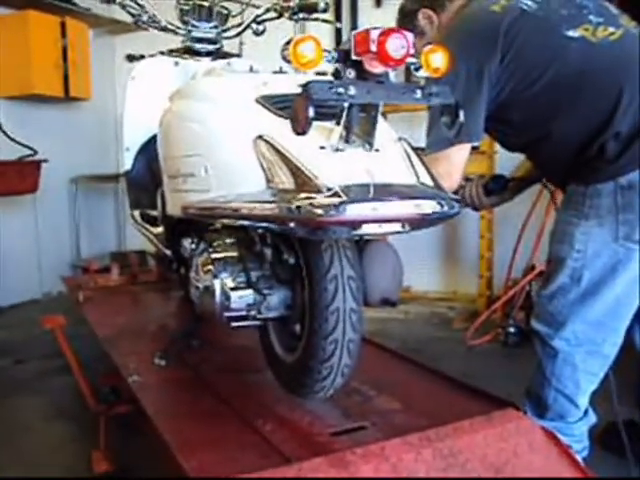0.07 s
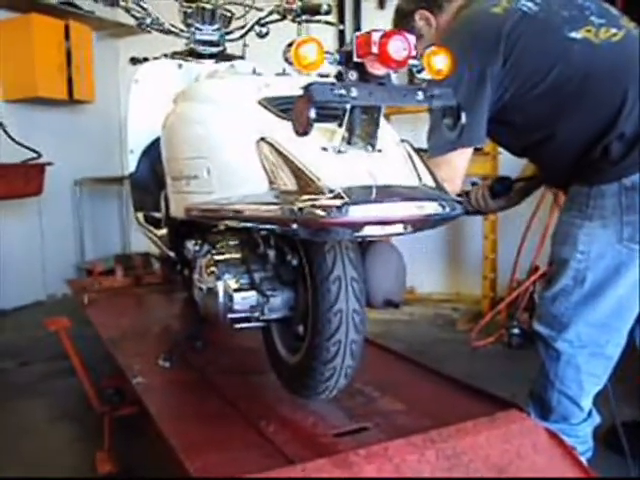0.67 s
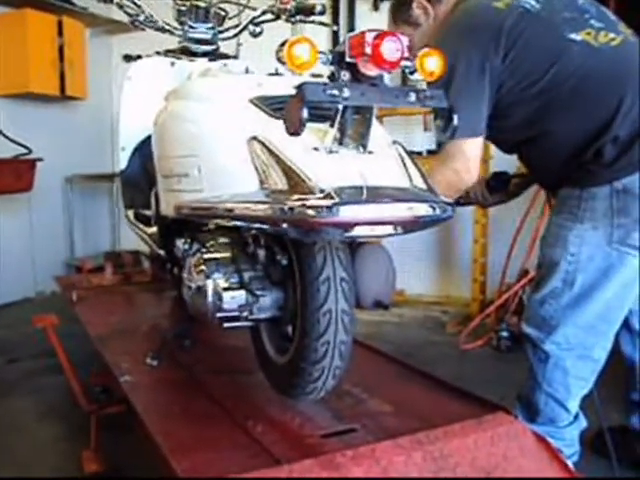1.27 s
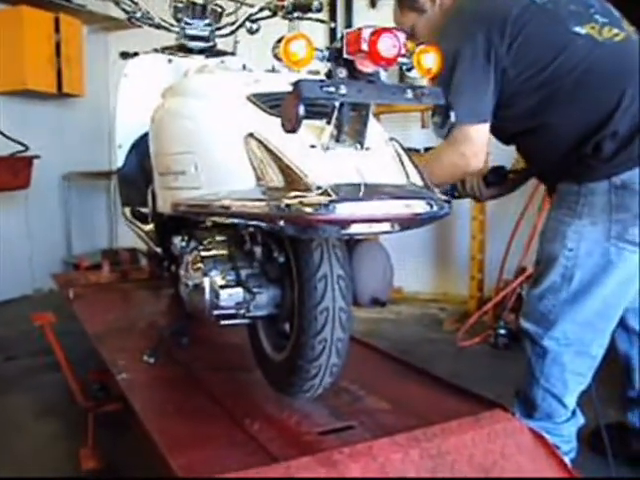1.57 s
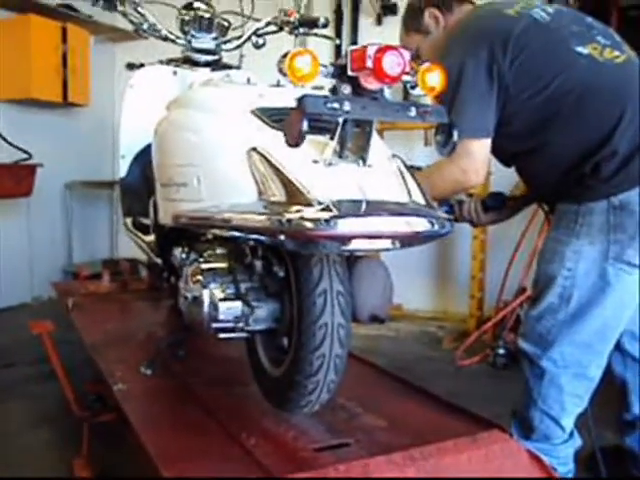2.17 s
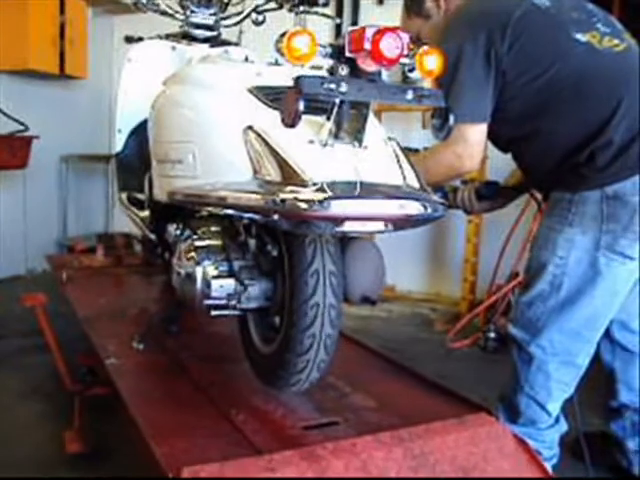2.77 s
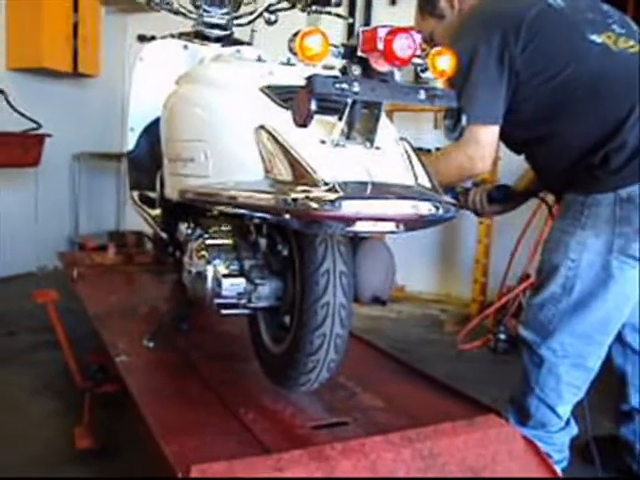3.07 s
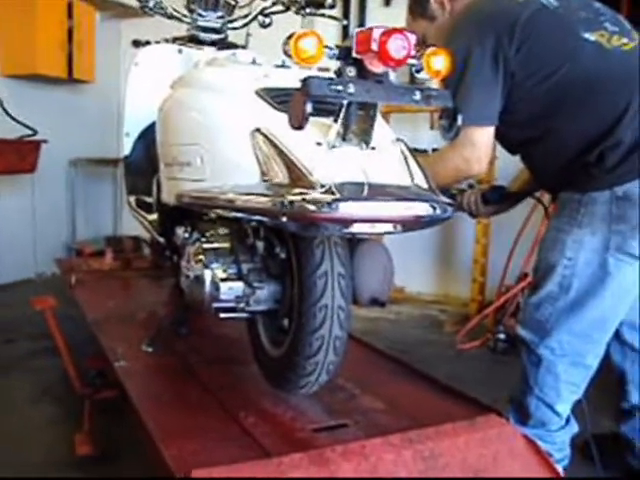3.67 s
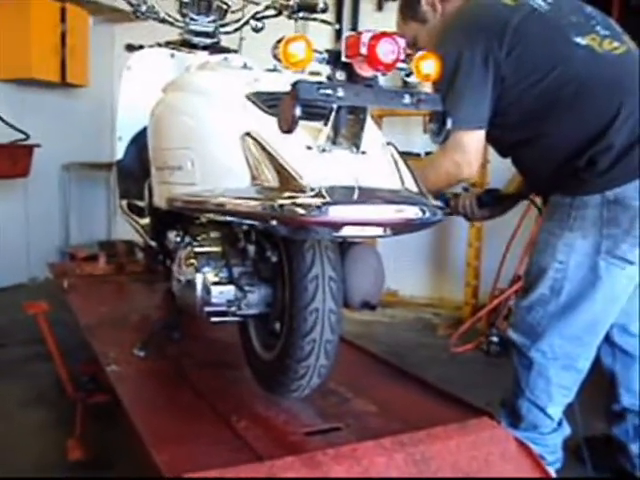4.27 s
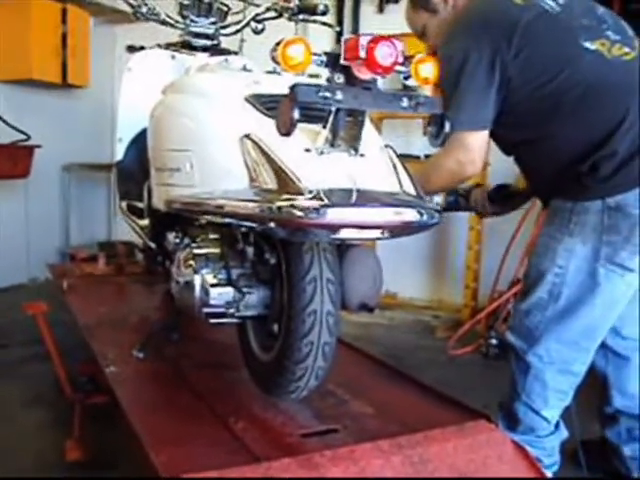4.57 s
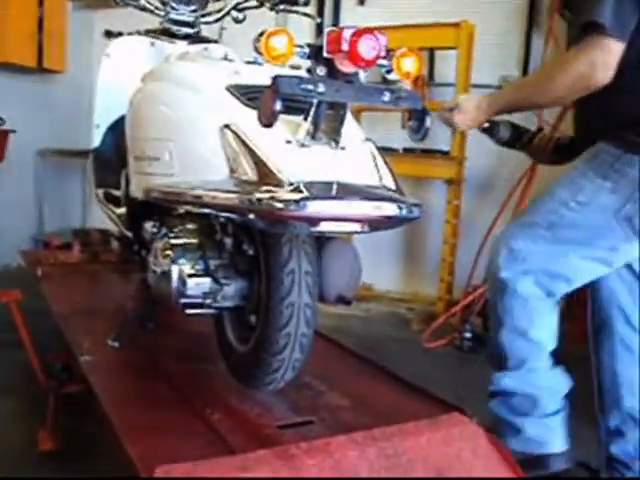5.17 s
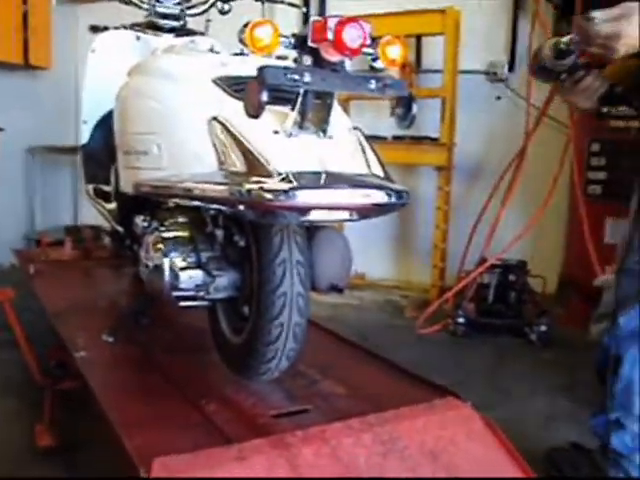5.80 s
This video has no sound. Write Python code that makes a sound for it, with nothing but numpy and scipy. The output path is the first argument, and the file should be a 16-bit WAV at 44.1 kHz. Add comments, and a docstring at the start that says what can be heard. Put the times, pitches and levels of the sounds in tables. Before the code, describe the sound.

Two hissing, buzzing runs of an air ratchet on scooter bolts, each coasting down in a falling rattle over low workshop hum.

```python
"""An air ratchet backs bolts out of a scooter in a workshop, in two bursts.
Exhaust air rushes and hums while the trigger is held; gears rattle and whine on as the rotor coasts.
The socket knocks on the bolts and scrapes, over a low workshop rush and hum.
A small camera samples the sound coarsely, which adds a thin fizz on top."""
import sys
import numpy as np
from scipy import signal
from scipy.fft import rfft, irfft, next_fast_len
from scipy.io import wavfile
from scipy.ndimage import map_coordinates

SR = 44100
rng = np.random.default_rng(int(sys.argv[2]) if len(sys.argv) > 2 else 0)


def transcribe(u):
    """Save the signal u as a 16-bit wav file named by the first command-line argument.

    u: samples, shape (n,) or (channels, n), limited to [-1, 1]; the rate is SR.
    q: integer samples, one column per channel.
    """
    v = np.clip(np.atleast_2d(u).T, -1, 1)
    q = np.round(v * 32767).astype(np.int16)
    wavfile.write(sys.argv[1], SR, q)


N = 257544

# Trigger pulls. Each row: touch, full squeeze, hardest press and release in seconds, rotor speed limit
# in Hz, friction loss in Hz/s, rattle and rasp in dB, fade as the tool is drawn away in dB/s.
PULLS = [(-.55, -.1, 0.63, 1.07, 337.2, 80.02, -30, -36.5, 0.5),
         (3.37, 3.715, 4.28, 4.63, 340, 104.9, -31, -42.5, 3.5)]


def amp(db):
    """Decibels to gain."""
    return 10 ** (np.asarray(db) / 20)


def unit(x):
    """Scale to rms 1."""
    return x / np.sqrt(np.mean(x ** 2) + 1e-20)


def along(points, hz):
    """(Hz, value) points read on a log axis."""
    f, v = np.transpose(points)
    return np.interp(np.log(hz + 1), np.log(f), v)


def bell(x, centre, half):
    """Gaussian hump of height 1."""
    return np.exp(-((x - centre) / half) ** 2)


def wobble(rate_hz):
    """Smooth random curve, rate_hz knots a second."""
    knots = rng.standard_normal(int(N * rate_hz / SR) + 4)
    return map_coordinates(knots, [np.arange(N) * rate_hz / SR])


def tone(turns):
    """Sine of rms 1, phase in turns."""
    return np.sqrt(2) * np.sin(2 * np.pi * turns)


def filtered(x, response):
    """x through a frequency response."""
    m = next_fast_len(N + SR // 2)
    return irfft(rfft(x, m) * response(np.fft.rfftfreq(m, 1 / SR)), m)[:N]


def shaped(x, spectrum):
    """x through a (Hz, dB) curve."""
    return filtered(x, lambda hz: amp(along(spectrum, hz)))


def coloured(x, spectrum):
    """x shaped, at rms 1."""
    return unit(shaped(x, spectrum))


def ringing(x, modes):
    """x through (Hz, width in Hz, dB) resonances, at rms 1."""
    return unit(filtered(x, lambda f: sum(
        amp(db) * 1j * f * width / (hz * hz - f * f + 1j * f * width) for hz, width, db in modes)))


def workshop(floor_db=-48.5, drone_hz=88.3, drone_db=-62):
    """Background rush, a low drone that swells once, and faint mains hum."""
    # Rush spectrum, then hum tones. Each row: frequency in Hz, level in dB.
    rush_spectrum = [(15, -46), (25, -29), (43, -9.5), (72, -11), (135, -9.5), (189, -5.5), (325, -5.5),
                     (363, -10), (667, -11.5), (746, -9.5), (914, -12), (1530, -26), (5400, -32.5),
                     (7020, -71), (11900, -120)]
    hum_tones = [(121, -62), (240, -61), (333, -63.5)]
    # Drone swell: centre and half length in seconds, rise in dB.
    drone_swell = (1.33, 0.34, 7.3)
    centre_s, half_s, swell_db = drone_swell
    t = np.arange(N) / SR
    rush = amp(floor_db + .6 * wobble(9.3)) * coloured(rng.standard_normal(N), rush_spectrum)
    drone_gain = amp(drone_db + swell_db * bell(t, centre_s, half_s) + wobble(21))
    drone = drone_gain * tone(drone_hz * t + .32 * wobble(14))
    return rush + drone + sum(amp(db) * tone(hz * t + .21 * wobble(10)) for hz, db in hum_tones)


def room(x):
    """Wall reverberation; treble dies first."""
    # Each row: frequency in Hz, t60 in seconds.
    wall_decay = [(150, 0.83), (1000, 0.49), (5000, 0.31)]
    hz, t, noise = signal.stft(rng.standard_normal(SR // 2), SR, nperseg=256)
    tail = signal.istft(noise * amp(-60 * t / along(wall_decay, hz)[:, None]), SR, nperseg=256)[1]
    return signal.fftconvolve(x, tail / np.linalg.norm(tail))[:N]


def handling(bump_t60_s=.26, bump_rise_s=.01):
    """The socket scrapes as it is moved; dull bumps as the mechanic steps back."""
    # Each row: centre and half length in seconds, level in dB.
    scrapes = [(2.672, .028, -50), (2.848, .008, -54), (2.975, .022, -49), (3.174, .009, -51),
               (3.275, .025, -53)]
    # Each row: frequency in Hz, level in dB.
    scrape_spectrum = [(300, -12), (800, 11.5), (1500, 2.5), (2050, -2), (2500, -20), (3400, -21),
                       (5400, -14)]
    # Each row: start in seconds, pitch in Hz, level in dB.
    bumps = [(4.65, 193, -45), (5.2, 190.5, -42), (5.279, 162, -42.5)]
    t = np.arange(N) / SR
    strokes = sum(amp(db) * bell(t, centre_s, half_s) for centre_s, half_s, db in scrapes)
    out = strokes * coloured(rng.standard_normal(N) * amp(2.2 * wobble(330)), scrape_spectrum)
    for start_s, hz, db in bumps:
        age_s = np.maximum(t - start_s, 0)
        out += amp(db - 60 * age_s / bump_t60_s) * (1 - np.exp(-age_s / bump_rise_s)) * tone(hz * age_s)
    return out


def burst(start_s, t60_s):
    """Decaying noise of one contact."""
    age_s = np.arange(N) / SR - start_s
    return rng.standard_normal(N) * (age_s >= 0) * amp(-60 * np.abs(age_s) / t60_s)


def contacts(knock_db=4, thud_db=1):
    """The socket knocks on the bolt, the scooter's body thuds under it, and loose steel ticks."""
    # Each row: start in seconds, level in dB, relative thud level in dB.
    knock_events = [(.147, -12, -8), (.988, -16, -25), (1.014, -17, -19), (1.029, -14.5, -17),
                    (1.116, -18, -32), (1.504, -20.5, -29), (2.652, -34, 5), (2.991, -30.5, 1),
                    (3.718, -26, -4), (3.754, -16, -9), (4.005, -16.5, -24), (5.228, -27, -9)]
    # Each row: start in seconds, level in dB.
    tick_events = [(2.8615, -32), (5.2435, -22), (5.353, -24.5)]
    # Each row: frequency in Hz, gain in dB.
    knock_spectrum = [(100, -38), (400, -14), (700, -6), (970, 5.5), (1300, -8), (2200, -24), (5400, -35)]
    thud_spectrum = [(120, -22), (300, 4), (650, 7.5), (1300, -33), (5000, -60)]
    tick_spectrum = [(300, -6), (900, 3), (1800, 2), (2350, 3), (2800, -7), (3450, -3), (4300, -7),
                     (5400, -12)]
    knocks, thuds = np.zeros(N), np.zeros(N)
    for start_s, db, body_db in knock_events:
        blow = amp(db) * burst(start_s, t60_s=.046)
        knocks += blow
        thuds += amp(body_db) * blow
    ticks = sum(amp(db) * burst(start_s, t60_s=.013) for start_s, db in tick_events)
    out = amp(knock_db) * shaped(knocks, knock_spectrum) + amp(thud_db) * shaped(thuds, thud_spectrum)
    return out + shaped(ticks, tick_spectrum)


def squeals():
    """Short groans and squeals swell and fade under load."""
    # Each row: centre and half length in seconds, pitch in Hz, glide in Hz/s, level in dB, blur in turns.
    squeal_events = [(0.763, 0.07, 429, 0, -36.5, 0.027), (3.532, .055, 591, -500, -43, 0.3),
                     (3.648, 0.043, 2056, 1206, -49.5, 0.11)]
    t, out = np.arange(N) / SR, np.zeros(N)
    for centre_s, half_s, hz, glide, db, blur in squeal_events:
        gain = amp(db + .77 * wobble(28)) * bell(t, centre_s, half_s)
        out += gain * tone(hz * t + glide * (t - centre_s) ** 2 / 2 + blur * wobble(170))
    return out


def drive(spin_up_s=.24, drag_s=2.5, crawl_hz=2):
    """Air spins the rotor up, drag and friction slow it; speed and pressing make the gears loud."""
    t = np.arange(N) / SR
    pulls = np.array(PULLS)
    latest = np.searchsorted(pulls[1:, 0], t)
    touch_s, _, hardest_s, release_s, top_hz, loss_hz_s, rattle_db, rasp_db, away_db_s = pulls[latest].T
    driven_s = np.minimum(t, release_s)
    coast_s = t - driven_s
    reached_hz = top_hz * (1 - np.exp((touch_s - driven_s) / spin_up_s))
    speed_hz = np.maximum(reached_hz * np.exp(-coast_s / drag_s) - loss_hz_s * coast_s, crawl_hz)
    speed_decades = np.log10(speed_hz / top_hz)
    eased_s2 = (driven_s - hardest_s) ** 2
    rattle_db = rattle_db + 41.5 * speed_decades - 13.5 * eased_s2 - away_db_s * coast_s
    rasp_db = rasp_db + 20.5 * speed_decades - 43 * eased_s2 - away_db_s * coast_s
    return speed_hz, rattle_db, rasp_db


def rotor(tremble=.008):
    """Turns made by the rotor, whose speed trembles."""
    speed_hz, _, _ = drive()
    return np.cumsum(speed_hz * (1 + tremble * wobble(45))) / SR


def vanes(turns, count=4, whirr_db=-8.5, blur_turns=.3):
    """The rotor's vanes sing a hoarse note, lifted as it sweeps through the head's resonance."""
    _, rattle_db, _ = drive()
    note = tone(count * turns + blur_turns * wobble(150) + .49 * wobble(30)) * amp(1.9 * wobble(40))
    return amp(rattle_db + whirr_db) * ringing(note, [(1005, 113, -2), (1113, 40, -9)])


def whine(turns, teeth=20, whine_db=-8, octave_db=-7, centre_hz=154, span_hz=83):
    """The gear mesh glides with the rotor, blurred in pitch, and stands out at speeds near centre_hz."""
    speed_hz, _, rasp_db = drive()
    mesh_turns = teeth * turns + .33 * speed_hz / centre_hz * wobble(380) + .14 * wobble(70)
    gain = amp(rasp_db + whine_db + .63 * wobble(55)) * bell(speed_hz, centre_hz, span_hz)
    return gain * (tone(mesh_turns) + amp(octave_db) * tone(2 * mesh_turns))


def impacts(turns, per_turn, scatter_db, slack_teeth=.25, slow_hz=50):
    """Gear teeth strike unevenly in time and force; mean power falls at rotor speeds below slow_hz."""
    teeth = np.arange(int(turns[-1] * per_turn))
    timing, polarity, force = rng.standard_normal((len(teeth), 3)).T
    at = np.interp((teeth + slack_teeth * timing) / per_turn, turns, np.arange(N)).astype(int)
    density = np.maximum(np.gradient(turns)[at], slow_hz / SR)
    return np.bincount(at, np.sign(polarity) * amp(scatter_db * force) / np.sqrt(density), N)


def gears(turns, head_db=-3, housing_db=-6, socket_db=-2.5, rasp_trim_db=-2, grip_hz=335, grip_db=9.5):
    """Tooth impacts rattle the head, ring the steel housing and socket, and add a bright rasp."""
    # Each row: frequency in Hz, level in dB.
    head_spectrum = [(30, -40), (150, -15.5), (240, -10), (300, -9.5), (390, -14), (520, -8), (700, -3),
                     (820, -2), (950, -3), (1250, -3.5), (1600, -5), (2000, -14), (2400, -18.5),
                     (3100, -22.5), (5000, -29)]
    rasp_spectrum = [(1500, -44), (2000, -2.5), (2400, -5), (2880, 0), (3150, -5.5), (3700, -4.5),
                     (4400, -11), (5400, -14.5)]
    # Each row: frequency and width in Hz, level in dB.
    housing_modes = [(920.5, 23, 0), (1008, 19, 3), (1081, 10.5, 3.5), (1214, 18, 1.5), (1340, 79, -12),
                     (1554, 21, -8.5), (1643, 7.2, -9), (1802, 15, -6.5), (1847, 27, -12), (1927, 16, -7.5)]
    socket_modes = [(947, 102, 9.5), (1820, 130, -11.5), (2770, 35, -5.5), (2886, 22, 0)]
    speed_hz, rattle_db, rasp_db = drive()
    chatter = amp(.32 * wobble(60))
    heavy = chatter * impacts(turns, per_turn=12, scatter_db=2.5)
    light = chatter * impacts(turns, per_turn=20, scatter_db=3)
    head = amp(head_db) * coloured(heavy, head_spectrum)
    housing = amp(housing_db) * ringing(light, housing_modes)
    # Held tight at speed, the socket comes loose and jingles as the rotor slows.
    loose = amp(socket_db - grip_db * (speed_hz / grip_hz) ** 4 + 2 * wobble(40))
    socket = loose * ringing(impacts(turns, per_turn=4, scatter_db=2.5), socket_modes)
    rasp = amp(rasp_db + rasp_trim_db) * coloured(light, rasp_spectrum)
    return amp(rattle_db) * (head + housing + socket) + rasp


def exhaust(turns, puff_depth=.34, valve_s=.031, half_open_db=-18.5, air_sag_db_s2=19):
    """While the trigger is held, air leaves in one puff a turn: a pulsing rush and a low hum."""
    # One row a pull: air and hum in dB, hum sag around the hardest press in dB/s^2, hum blur in turns.
    blows = [(-31.5, -41.5, 6, 0.14), (-35.5, -39, 83, 0.062)]
    # Air at the first bolt, then with the tool turned. Each row: frequency in Hz, level in dB.
    first_spectrum = [(71, -45), (120, -24), (288, -7.5), (327, -4.5), (384, -4.5), (429, -8.5),
                      (465, -6.5), (982, -3.5), (1120, -32), (1270, -10.5), (1860, -8.5), (2250, -16.5),
                      (2860, -16.5), (5400, -33.5), (7020, -60), (11900, -120)]
    turned_spectrum = [(71, -45), (120, -25), (227, -19), (284, -7.5), (327, 2), (378, -10.5), (726, -6.5),
                       (811, -24), (998, 0), (1210, -16), (1420, -5), (1770, -16), (1890, -15), (5400, -32),
                       (7020, -63), (11900, -120)]
    t, out = np.arange(N) / SR, np.zeros(N)
    ramp = lambda at_s: np.clip((t - at_s) / valve_s + .5, 0, 1)
    for pull, blow, spectrum in zip(PULLS, blows, (first_spectrum, turned_spectrum)):
        touch_s, squeeze_s, hardest_s, release_s = pull[:4]
        air_db, hum_db, hum_sag_db_s2, blur_turns = blow
        valve = ramp(touch_s) * amp(half_open_db * (1 - ramp(squeeze_s)))
        valve *= 1 - ramp(release_s + valve_s / 2)
        eased_s2 = (t - hardest_s) ** 2
        jet = rng.standard_normal(N) * (1 + puff_depth * tone(turns))
        out += valve * amp(air_db - air_sag_db_s2 * eased_s2) * coloured(jet, spectrum)
        hum_gain = amp(hum_db - hum_sag_db_s2 * eased_s2 + 1.3 * wobble(25))
        out += valve * hum_gain * tone(turns + blur_turns * wobble(45))
    return out


def scene(room_db=-8.5):
    """One rotor drives air, gears, vanes and whine; the mechanical sounds reverberate."""
    turns = rotor()
    metal = gears(turns) + vanes(turns) + whine(turns) + contacts() + handling()
    return (exhaust(turns) + squeals() + metal + amp(room_db) * room(metal) + workshop())[None]


def record(dry, hold_samples=4, band_hz=5512, top_hz=15500):
    """The camera's sample-and-hold mirrors the sound faintly into the treble."""
    narrow = filtered(dry[0], lambda hz: hz < band_hz)
    held = np.repeat(narrow[::hold_samples], hold_samples)[:N]
    return filtered(held, lambda hz: hz < top_hz)[None]


dry = scene()
out = record(dry)
transcribe(out)
```